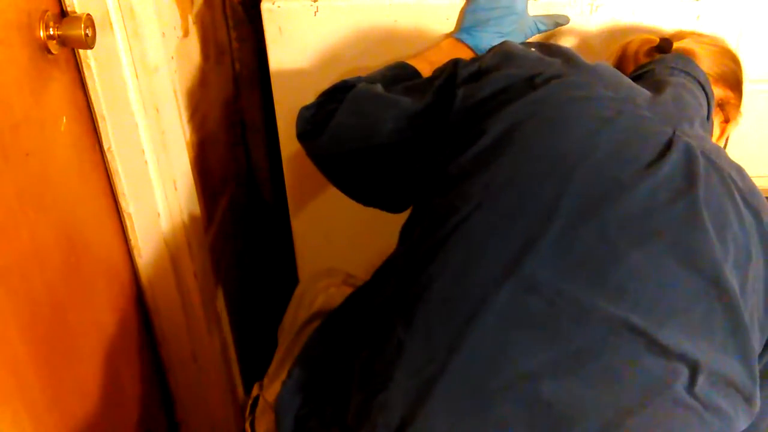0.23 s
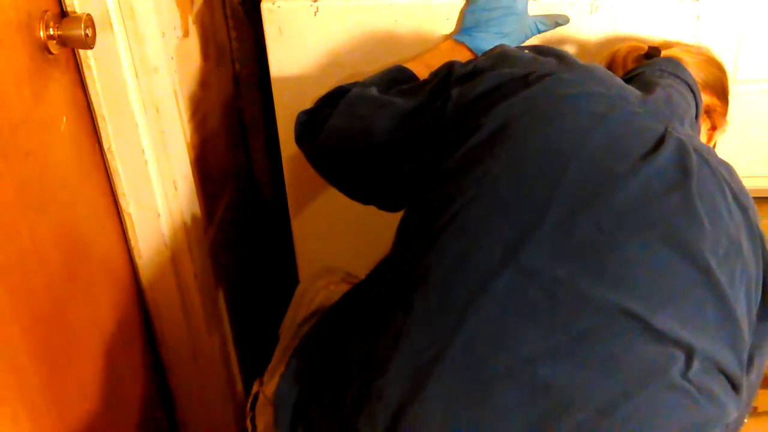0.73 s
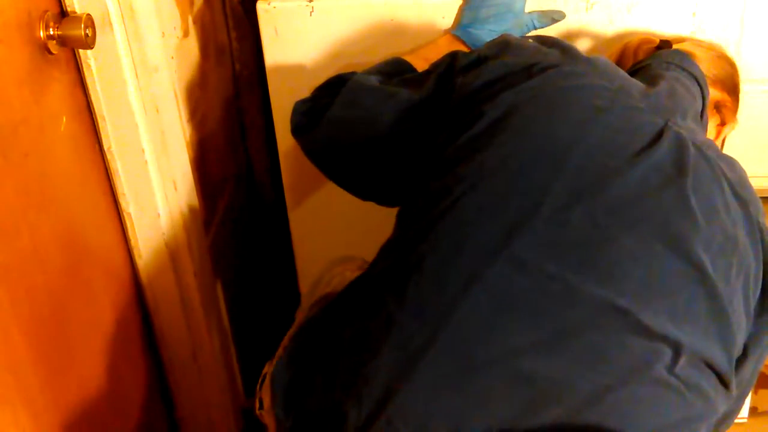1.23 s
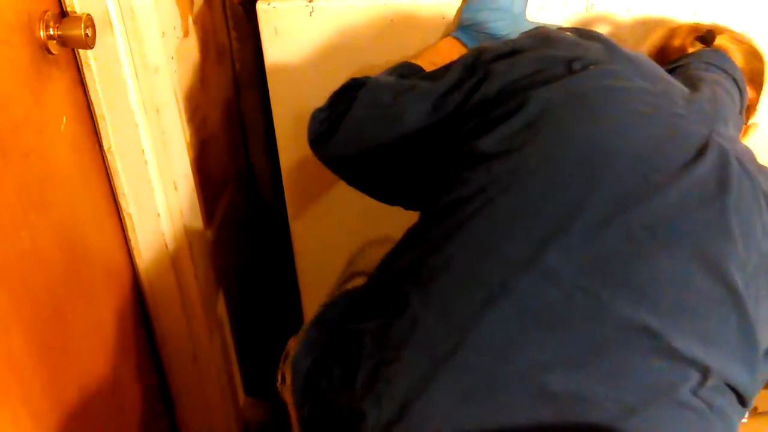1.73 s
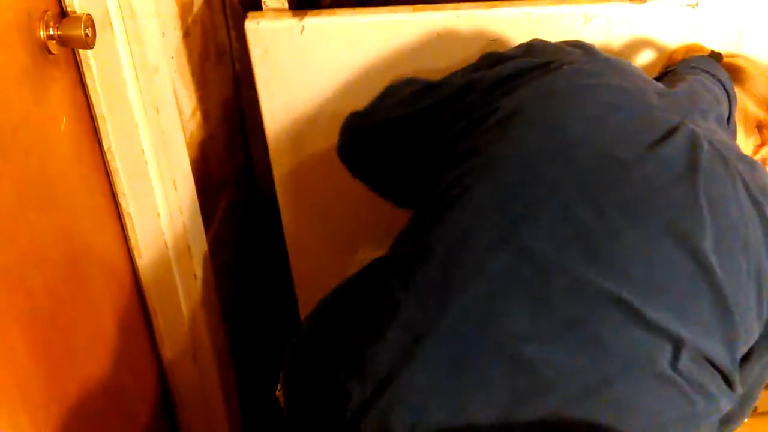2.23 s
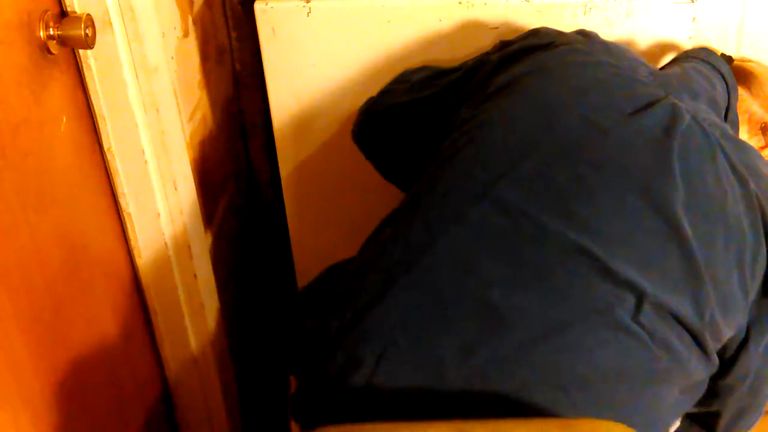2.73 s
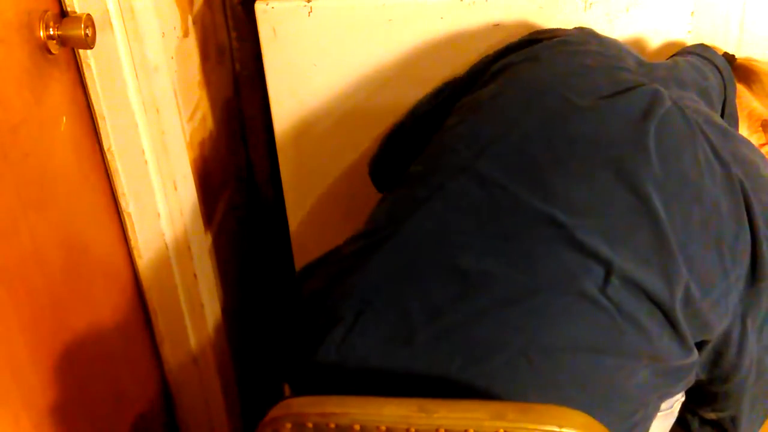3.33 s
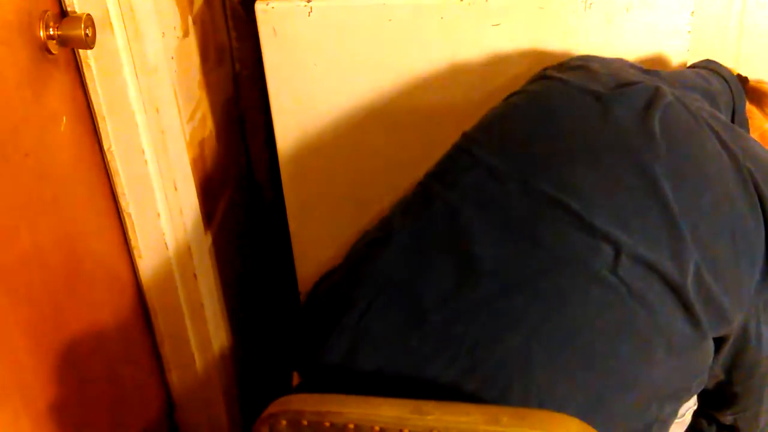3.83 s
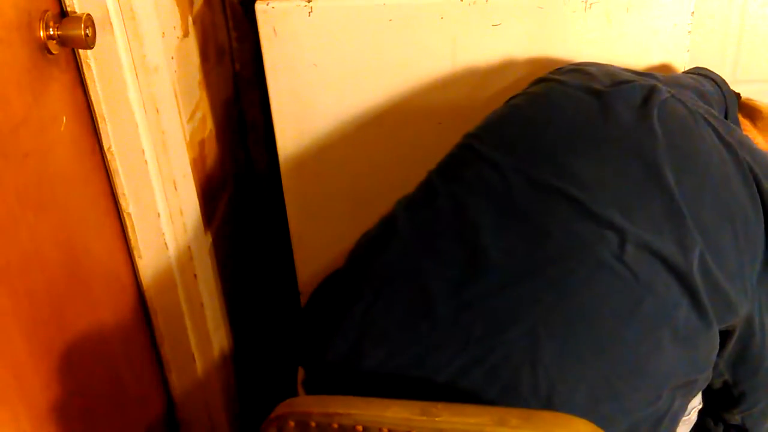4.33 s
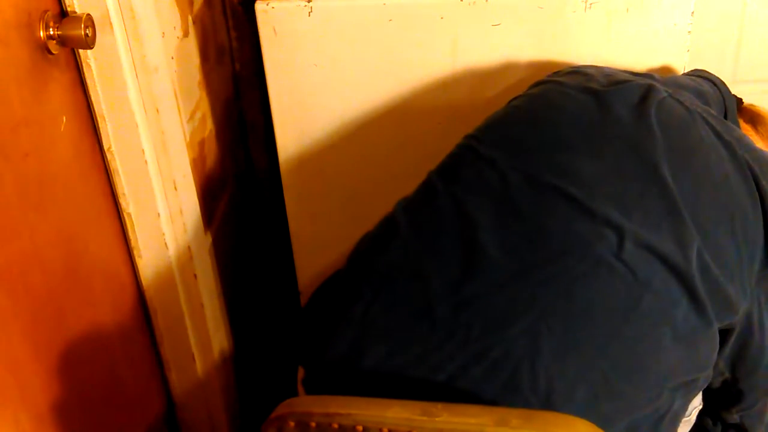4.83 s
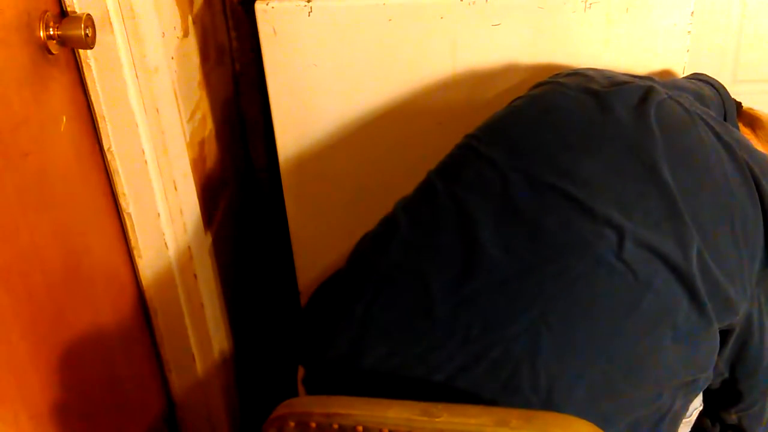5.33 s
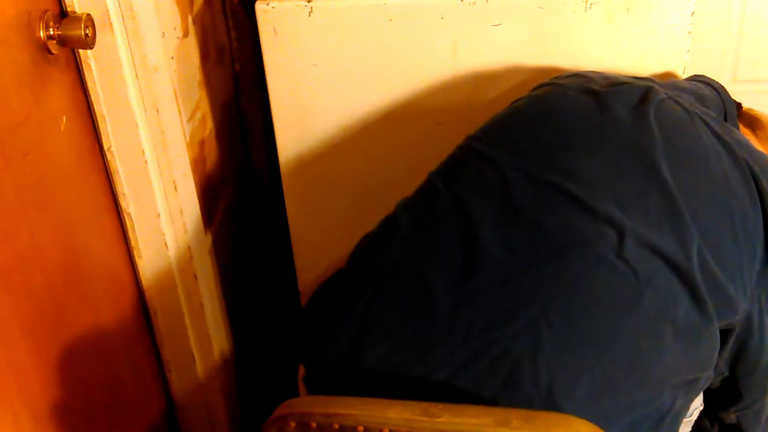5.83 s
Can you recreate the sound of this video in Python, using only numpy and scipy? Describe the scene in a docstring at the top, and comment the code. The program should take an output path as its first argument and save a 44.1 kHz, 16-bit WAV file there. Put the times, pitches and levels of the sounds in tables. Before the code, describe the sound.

Close, indoor handling of a metal appliance cabinet: a tiny clink, a brighter bracket clank with a soft thud, a pause, then rubbing and scraping into a clattering clunk. A second, heavier bang resonates low and fades. Light ticks, a short stuttering scrape and two quick knocks end it over faint wavering hum.

```python
"""A faint wavering hum in a small room, then a soft hiss of sliding parts and the clink of loose metal.
A panel is worked back onto a washing machine: it scrapes along its seat and clunks home twice, the cabinet
booms on, and small knocks, rubs and a jerky edge scrape follow. Blows and tiny slips excite decaying sine
modes and banded noise; the hum is sines over coloured noise."""
import sys
import numpy as np
from scipy import signal
from scipy.fft import rfft, irfft
from scipy.io import wavfile

SR = 44100
rng = np.random.default_rng(int(sys.argv[2]) if len(sys.argv) > 2 else 0)


def log_audio(samples):
    """Write samples as a 16-bit WAV file to the path given in sys.argv[1]."""
    # one column per channel
    frames = np.atleast_2d(samples).T
    # limit to full scale, then quantise
    limited = np.clip(frames, -1, 1)
    pcm = np.round(limited * 32767).astype(np.int16)
    wavfile.write(sys.argv[1], SR, pcm)


N = 267819
T = np.arange(N) / SR
TAIL = T[:2 * SR]  # time axis of one ringing sound


def undb(db):
    """Decibels to gain."""
    return 10 ** (np.asarray(db) / 20)


def decay(t, t60):
    """Exponential decay that falls 60 dB in t60 seconds."""
    return np.exp(-np.log(1000) * t / t60)


def lookup(points, hz):
    """Read (frequency [Hz], value) points on a log-frequency axis."""
    f, value = np.transpose(points)
    return np.interp(np.log(np.maximum(hz, 1)), np.log(f), value)


def colour(x, points):
    """Minimum-phase filter with the given (frequency [Hz], level [dB]) outline."""
    size = 8192
    gain = undb(lookup(points, np.fft.rfftfreq(size, 1 / SR)))
    # folding the cepstrum onto positive time makes the filter causal
    cepstrum = irfft(np.log(gain))
    cepstrum[1:size // 2] *= 2
    cepstrum[size // 2 + 1:] = 0
    impulse = irfft(np.exp(rfft(cepstrum)))
    return signal.fftconvolve(x, impulse[None], axes=-1)[:, :x.shape[-1]]


def add(out, s, x):
    """Mix x into out from time s."""
    i = int(s * SR)
    out[:, i:i + x.shape[-1]] += x[..., :N - i]


def air_noise(count, side_db=-11.0, side_hz=4500):
    """White noise that differs between left and right only in the treble."""
    mid, side = rng.standard_normal((2, count))
    treble_only = signal.butter(12, side_hz, "high", fs=SR, output="sos")
    side = signal.sosfilt(treble_only, side) * undb(side_db)
    return np.array([mid + side, mid - side])


def wander(rate, count, channels=1):
    """Smooth random curves of spread near 1 that change about rate times a second."""
    knots = rng.standard_normal((channels, 1024))
    position = np.arange(count) * rate / SR
    return np.array([np.interp(position, np.arange(1024), k) for k in knots])


# colour of the room at rest: (frequency [Hz], relative level [dB per Hz])
ROOM_COLOUR = [(20, -4.5), (60, -5.5), (120, -8.5), (220, -21), (450, -25), (800, -26), (1400, -29),
               (2500, -36), (6000, -39.5), (14000, -46.5)]
ROOM_DB = -61  # rms of the coloured noise
# mains hum: (frequency [Hz], rms level before wavering [dB])
HUM_TONES = [(48.4, -66.5), (96.9, -69)]


def room_tone(waver=0.19):
    """Low rumble and faint hiss from coloured noise, with sines that waver in level and phase."""
    noise = colour(air_noise(N), ROOM_COLOUR)
    hum = 0
    for hz, db in HUM_TONES:
        sway = wander(10.0, N)
        tone = np.sin(2 * np.pi * hz * T + sway)
        hum = hum + np.sqrt(2) * undb(db) * (1 + waver * sway) * tone
    return noise * undb(ROOM_DB) / np.std(noise) + hum


def favoured(hz, spread_db=2.5):
    """Each spot that is struck favours some clusters of modes above 300 Hz and misses others."""
    octaves = np.arange(0, 15, 1 / 18)
    favour = rng.standard_normal(len(octaves))
    favour_db = spread_db * np.interp(np.log2(np.maximum(hz, 1)), octaves, favour)
    return undb(favour_db * (hz > 300))


# base decay of the cabinet's dense upper modes together with the room: (frequency [Hz], t60 [s])
DENSE_DECAY = [(60, 0.98), (180, 1.15), (450, 0.88), (1000, 0.7238), (2500, 0.6152), (5000, 0.4823),
               (8000, 0.55), (13000, 0.49)]
# their colour: (frequency [Hz], level [dB])
DENSE_COLOUR = [(25, -33), (45, -14.5), (70, 3.5), (110, -4.5), (170, -3.5), (400, 0), (800, -0.5),
                (1300, -1), (3400, -6), (5900, 2), (8300, -6), (14000, -3)]


def wash(length, treble_length=None, early=1.1, early_s=0.041):
    """Countless overlapping modes: coloured half-octave noise bands, each with its own decay."""
    t = TAIL[:SR]
    spectrum, f = rfft(air_noise(SR)), np.fft.rfftfreq(SR, 1 / SR)
    # equal power per half octave before the colour is applied
    equal_power = np.sqrt(SR / 2 / np.log(2) / np.maximum(f, 1))
    spectrum = spectrum * favoured(f) * undb(lookup(DENSE_COLOUR, f)) * equal_power
    lengths = [(1400, length), (4500, treble_length or length)]  # (frequency [Hz], decay factor)
    out = 0
    for hz in 20 * 2 ** (np.arange(20) / 2):
        band = irfft(spectrum * ((f >= hz) & (f < hz * np.sqrt(2))))
        # first reflections give the treble an extra crack
        crack = 1 + early * min(hz / 7000, 1) * np.exp(-t / early_s)
        out = out + band * crack * decay(t, lookup(lengths, hz) * lookup(DENSE_DECAY, hz))
    return np.pad(out, ((0, 0), (0, len(TAIL) - SR)))


def ring(modes, length=1, scatter_db=1.5):
    """Decaying modes with levels scattered at every call; reflections make the higher ones beat faster."""
    out = np.zeros(len(TAIL))
    for hz, db, t60 in modes:
        count = min(int(1.5 * t60 * length * SR), len(TAIL))
        t = TAIL[:count]
        depth = np.clip(hz / 1200, .2, .7)
        swell, sway = depth * wander(hz / 30, count, channels=2)
        phase = 2 * np.pi * (hz * t + rng.random()) + 2 * sway
        level = undb(db + scatter_db * rng.standard_normal())
        out[:count] += level * (1 + swell) * np.sin(phase) * decay(t, t60 * length)
    return out


def stroke(swell_s, fade_s):
    """Pressure of a stroke that swells and eases off, faltering as the hand shifts its grip."""
    t = TAIL[:int((swell_s + fade_s) * SR)]
    falter = undb(2.5 * wander(35, len(t))[0])
    return np.interp(t, [0, swell_s, swell_s + fade_s], [0, 1, 0]) * falter


def slips(pressure, slips_per_s=700, spread_db=3):
    """Sliding is a run of tiny slips of uneven size, at random moments and of either sign."""
    chance, sign, size = rng.random((3, len(pressure)))
    size_db = spread_db * np.minimum(-np.log(size), 4)
    kicks = (chance < slips_per_s / SR) * np.sign(sign - .5) * undb(size_db)
    even_level = kicks / (np.std(kicks) + 1e-9)
    return even_level * pressure / np.sqrt(.02 * SR)


PUSH_STEEPNESS, CLICK_STEEPNESS = 1.58, 2.45  # filter orders of the fall beyond the reach


def contact(push_db, push_hz, click_db, click_hz, octaves):
    """(frequency [Hz], level [dB]) outline of a contact: a low-passed push plus a band of click."""
    hz = np.geomspace(20, SR / 2, 60)
    push = undb(push_db) ** 2 / (1 + (hz / push_hz) ** (2 * PUSH_STEEPNESS))
    above, below = hz / click_hz, click_hz / 2 ** octaves / hz
    click = undb(click_db) ** 2 / (1 + above ** (2 * CLICK_STEEPNESS) + below ** (2 * CLICK_STEEPNESS))
    return np.column_stack([hz, 10 * np.log10(push + click)])


# the cabinet's panels: (frequency [Hz], relative level [dB], t60 before length scaling [s])
CABINET_MODES = [(76.1, -5.5, 1.83), (137.3, -2.5, 1.19), (166.8, 2, 0.691), (232.6, -7.5, 1.2),
                 (296, -11, 0.75), (357, -5, 0.85), (404, -8.5, 0.94), (461.7, 1.5, 0.29),
                 (500, -5.5, 0.55), (605, -8, 0.8), (620, -7, 0.42), (705, -6.5, 0.69), (833, -6, 0.58),
                 (1036, -9.5, 0.71), (1445, -9, 0.31), (1800, -9, 0.12), (5300, -15, 0.38)]


def slide(pressure, length=0.49, modes_db=-2):
    """Every slip of a stroke excites the same cabinet."""
    body = wash(length) + undb(modes_db) * ring(CABINET_MODES, length)
    return signal.fftconvolve(body, slips(pressure)[None], axes=-1)


# parts and sleeves sliding:
# (start [s], swell [s], fade [s], rumble level [dB], hiss level [dB], hiss reach [Hz])
SLIDING_STROKES = [ (.139, 0.014, 0.17, -90.5, -63.5, 9000), (0.661, 0.11, 0.08, -84, -66, 4800),
                   (1.678, 0.057, 0.51, -69.5, -67.5, 7000), (1.76, 0.04, 0.015, -58.5, -47.5, 4400),
                   (1.93, 0.2, 0.15, -56, -54.5, 2300), (2.021, 0.015, 0.48, -51.5, -64, 6000),
                   (2.251, .09, 0.11, -47, -54.5, 6500), (2.66, 0.17, 0.31, -62, -68, 5000),
                   (3.332, 0.1, 0.26, -60, -67.5, 8100)]
RUMBLE_REACH_HZ, HISS_OCTAVES = 483.8, 1.48  # the hiss band spans these octaves below its reach
# the bracket scraping to its seat: (start [s], swell [s], fade [s], level [dB])
BRACKET_SCRAPE = (2, .17, .12, -65.5)


def rubs():
    """Strokes along the cabinet rumble and hiss; slips ring the bracket as it scrapes to its seat."""
    out = np.zeros((2, N))
    for s, swell_s, fade_s, rumble_db, hiss_db, hiss_hz in SLIDING_STROKES:
        outline = contact(rumble_db, RUMBLE_REACH_HZ, hiss_db, hiss_hz, HISS_OCTAVES)
        add(out, s, colour(slide(stroke(swell_s, fade_s)), outline))
    s, swell_s, fade_s, db = BRACKET_SCRAPE
    low_modes = [mode for mode in BRACKET_MODES if mode[0] < 4000]
    bracket = ring(low_modes, length=0.4)
    add(out, s, undb(db) * signal.fftconvolve(bracket, slips(stroke(swell_s, fade_s))))
    return out


def build_up(ms):
    """Sound from behind the machine arrives by reflections, so it swells with this time constant."""
    return 1 - np.exp(-TAIL * 1000 / ms)


# a small steel fitting: (frequency [Hz], relative level [dB], t60 [s])
FITTING_MODES = [(2590, -13, 0.28), (2720, -4, 0.19), (4000, -3, 0.26), (4170, 2, 0.19), (6040, -2.5, 0.22),
                 (6100, -5, 0.22), (7430, -8, 0.19)]
# its blows: (time [s], level [dB], build-up [ms])
FITTING_CLINKS = [(0.259, -45, 0.44), (0.307, -51.5, 0.45)]
# a steel bracket, frequencies before detuning: (frequency [Hz], relative level [dB], t60 [s])
BRACKET_MODES = [(371, -8, 0.47), (751, -1.5, 0.47), (836, 0, 0.42), (874, -11, 0.47), (1052, -7.5, 0.28),
                 (1353, -10, 0.65), (2248, 0.5, 0.2), (2437, -5.5, 0.43), (2700, -7, 0.22), (3040, -3, 0.2),
                 (3206, -2.5, 0.27), (4690, -4, 0.27), (5020, -4, 0.26)]
# its blows: (time [s], level [dB], build-up [ms])
BRACKET_CLINKS = [(.841, -39.5, 2.6), (.851, -35.5, 2.6), (.888, -48.5, 1.5)]


def clinks(modes, blows, tick, length):
    """A steel part: its modes, detuned a little by every new contact, over a reverberant tick."""
    out = np.zeros((2, N))
    for s, db, ms in blows:
        seated = [(hz * (1 + .007 * rng.standard_normal()), *rest) for hz, *rest in modes]
        add(out, s, undb(db) * build_up(ms) * (ring(seated) + colour(wash(length), tick)))
    return out


# blows on the cabinet, a dull push plus the click of an edge; harder contact reaches higher:
# (time [s], build-up [ms], push level [dB], push reach [Hz], click level [dB], click reach [Hz])
CABINET_BLOWS = [ (0.728, 0.51, -83, 300, -56.5, 4840), (.841, 6, -44.5, 700, -40, 8200),
                 (1.059, 4.9, -45, 197, -46.5, 2960), (1.104, 10.4, -42.5, 1730, -44.5, 6400),
                 (1.207, 3.8, -56.5, 1490, -67, 5000), (1.861, 0.68, -56, 603, -48, 5500),
                 (2.243, 17, -32, 309.3, -44, 5300), (2.279, 1.3, -46, 328.3, -49, 9000),
                 (2.450, 1.1, -32, 1020, -39, 9000), (2.461, 2, -29.5, 1275, -34.5, 7200),
                 (2.490, 3.8, -29, 1310, -31.5, 5800), (3.075, 29, -42, 163.6, -63, 5530),
                 (3.1529, 1.8, -32, 780, -27.5, 9600), (3.168, 0.67, -27, 780, -35, 7000),
                 (4.127, .9, -56.5, 453, -81, 5030), (4.4, 0.89, -69, 299.3, -72.5, 1700),
                 (4.668, 1.74, -65.5, 920, -68.5, 5770), (5.57, 5.5, -47, 407, -44.5, 5600),
                 (5.625, 2.4, -46.5, 1500, -43.5, 5000)]
CLICK_OCTAVES = 1.735  # width of a click, below its reach
# decay factors of a pure click, of a pure push, and of the treble of either
TAP_RING, PUSH_RING, TREBLE_RING = 0.39, 0.99, 0.62


def knocks(modes_db=1.0, wash_db=-0.68, rattle_db=0.26, rattle_hz=90):
    """Each blow rings the panels and the room, the longer the more push it has; loose seams chatter."""
    out = np.zeros((2, N))
    for s, ms, push_db, push_hz, click_db, click_hz in CABINET_BLOWS:
        push_share = 1 / (1 + undb(click_db - push_db))
        length = TAP_RING + (PUSH_RING - TAP_RING) * push_share
        chatter = undb(rattle_db * wander(rattle_hz, len(TAIL)))
        dense = undb(wash_db) * wash(length, TREBLE_RING) * chatter
        panels = undb(modes_db) * ring(CABINET_MODES, length)
        outline = contact(push_db, push_hz, click_db, click_hz, CLICK_OCTAVES)
        add(out, s, colour((dense + panels) * build_up(ms), outline))
    return out


# short decaying tones: panels flexing for a few cycles, a brief squeak at 1.948 s and small tonal knocks: (time
# [s], frequency [Hz], level [dB], t60 [s])
SHORT_TONES = [(1.07, 45.8, -47, 0.28), (1.109, 62, -24.5, 0.062), (1.8604, 210, -21.5, 0.029),
               (1.948, 570, -45, .07), (2.2466, 158, -21, 0.18), (2.469, 180, -16.5, 0.13),
               (3.172, 177, -5, 0.041), (3.171, 68.8, -16, 0.26), (4.399, 1440, -61, 0.13),
               (4.670, 933, -54, 0.091)]


def thumps(rise_ms=1.4):
    """Short decaying sines: a pushed panel gives way and is at once damped by the hand, a part squeaks briefly,
    small knocks ring a single pitch."""
    out = np.zeros((2, N))
    for s, hz, db, t60 in SHORT_TONES:
        flex = np.sin(2 * np.pi * hz * TAIL) * decay(TAIL, t60)
        add(out, s, undb(db) * build_up(rise_ms) * flex)
    return out


# blows that leave one resonance singing: (time [s], frequency [Hz], level [dB])
SINGING_TONES = [(1.109, 1750, -48), (2.223, 147.5, -37.5), (2.453, 245, -21), (2.452, 470.4, -24.5),
                 (4.129, 139.8, -44.5), (4.129, 433, -50), (4.4, 1226, -64), (4.670, 430, -59),
                 (4.670, 847, -61), (5.572, 385, -42), (5.572, 2350, -51), (5.626, 614.6, -44.5),
                 (5.627, 873, -44), (5.627, 1365, -49), (5.628, 6000, -48)]
SINGING_RING = 0.55  # its decay as a share of the dense modes' at that pitch
# jolts after which the freest panel drones on: (time [s], level [dB])
DRONE_STARTS = [(3.17, -43.5), (4.983, -63)]
DRONE_HZ, DRONE_T60_S = 172.3, 3.6


def rings(rise_ms=2):
    """A blow in the right place leaves one resonance singing; the freest panel decays slowest."""
    out = np.zeros((2, N))
    tones = [(s, hz, db, SINGING_RING * lookup(DENSE_DECAY, hz)) for s, hz, db in SINGING_TONES]
    tones += [(s, DRONE_HZ, db, DRONE_T60_S) for s, db in DRONE_STARTS]
    for s, *mode in tones:
        add(out, s, build_up(rise_ms) * ring([mode], scatter_db=0))
    return out


# a steel edge dragged along the cabinet in jerks: (start [s], swell [s], fade [s], level [dB])
EDGE_STROKES = [(4.915, 0.0098, 0.037, -54), (4.96, 0.04, 0.092, -57), (5.04, 0.063, 0.089, -52.5)]
# colour of its scrape and tick: (frequency [Hz], level [dB])
EDGE_COLOUR = [(100, -17), (400, -9.5), (700, -10), (1050, -5), (2400, -6.5), (3600, -14), (6300, -5.5),
               (13000, -23)]
# its modes: (frequency [Hz], relative level [dB], t60 [s])
EDGE_MODES = [(1040, 1.5, 0.17), (1887, -2.5, 0.24), (4670, -4, 0.25), (6500, 2, 0.097), (8720, -0.5, 0.13)]
# its blows, played by clinks: (time [s], level [dB], build-up [ms])
EDGE_CLINKS = [(5.571, -49, 3.6)]


def drag(modes_db=-11, length=0.49):
    """The edge catches and slips in coarse grains that ring its own modes and the cabinet behind it."""
    out = np.zeros((2, N))
    body = colour(wash(length), EDGE_COLOUR) + undb(modes_db) * ring(EDGE_MODES)
    for s, swell_s, fade_s, db in EDGE_STROKES:
        grains = slips(stroke(swell_s, fade_s), slips_per_s=500)
        add(out, s, undb(db) * signal.fftconvolve(body, grains[None], axes=-1))
    return out


def scene():
    """All the handling over the quiet room."""
    # tick colours: (frequency [Hz], level [dB])
    fitting_tick = [(600, -40), (2500, -5.0), (6000, -8.5), (9000, -11.0), (13000, -22)]
    bracket_tick = [(400, -18.5), (780, 0.5), (1300, -10.5), (2700, 1.5), (3800, -10),
                    (6000, -5.5), (9000, -33)]
    fitting = clinks(FITTING_MODES, FITTING_CLINKS, fitting_tick, length=0.54)
    bracket = clinks(BRACKET_MODES, BRACKET_CLINKS, bracket_tick, length=0.71)
    edge = drag() + clinks(EDGE_MODES, EDGE_CLINKS, EDGE_COLOUR, length=0.89)
    return room_tone() + rubs() + fitting + bracket + knocks() + thumps() + rings() + edge


def record(dry):
    """A steep elliptic low-pass cuts the top."""
    top_hz = 14250
    return signal.sosfilt(signal.ellip(10, .2, 70, top_hz, fs=SR, output="sos"), dry)


dry = scene()
out = record(dry)
log_audio(out)
```